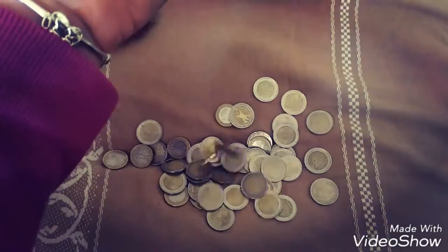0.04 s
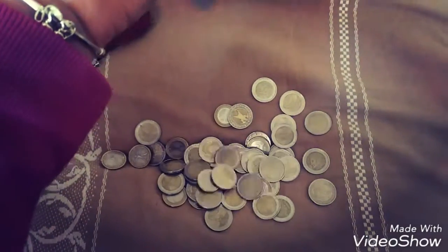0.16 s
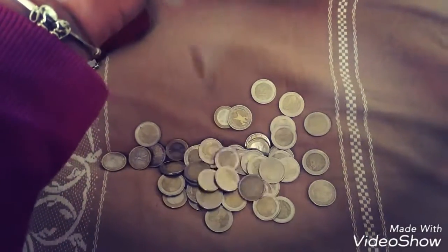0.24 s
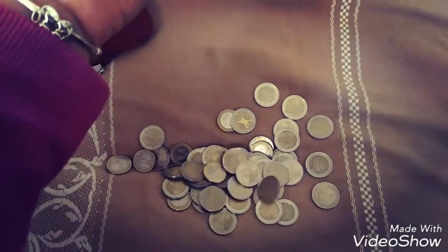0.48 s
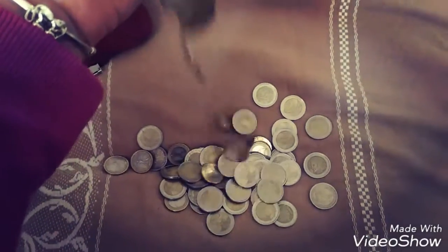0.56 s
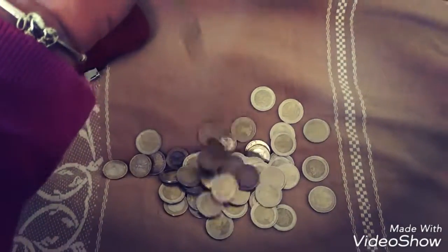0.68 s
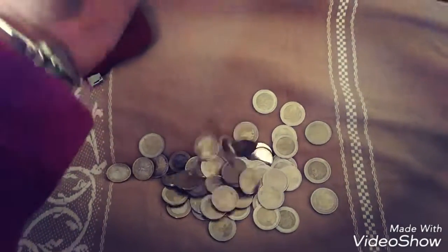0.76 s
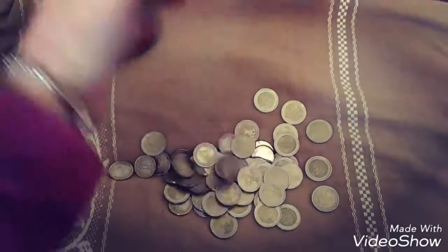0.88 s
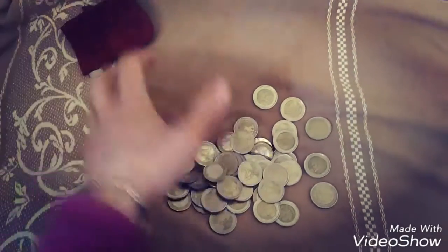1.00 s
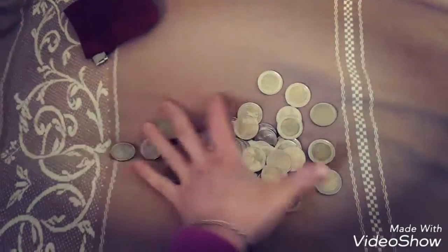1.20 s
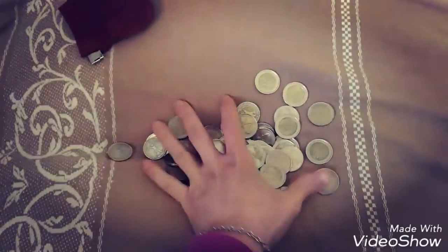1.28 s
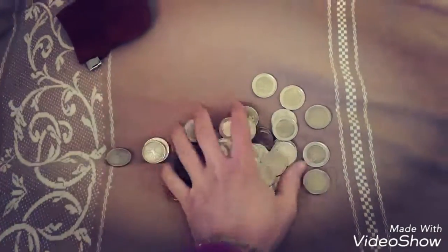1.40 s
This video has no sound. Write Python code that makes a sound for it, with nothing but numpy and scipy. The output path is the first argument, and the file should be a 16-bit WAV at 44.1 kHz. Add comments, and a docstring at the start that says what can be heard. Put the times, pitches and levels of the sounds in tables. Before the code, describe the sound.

Coins clink close by in a small room. After a few light ticks, they drop onto a pile in spurts at about 0.1, 0.3 and 0.6 seconds, each a short clack with a thin, high ring. The cloth-covered wooden table thuds under heavier hits. A dense jingle comes from 0.8 to 1.1 seconds as a hand lands and spreads them, then slides and faint clinks fade by 1.5 seconds.

```python
"""A faint slide and a few light clinks, then coins drop in spurts onto a pile on a cloth-covered
wooden table; a hand lands on the pile and spreads it. Each contact is a short clack, choked by the
other coins, with a thin ring near 10 kHz. Loose coins slide, jingle and drag on the cloth.
The table thuds under the heavier blows. A small room answers; the stereo microphone is close."""
import sys
import numpy as np
from scipy import signal
from scipy.fft import rfft, irfft, next_fast_len
from scipy.io import wavfile

SR = 44100
rng = np.random.default_rng(int(sys.argv[2]) if len(sys.argv) > 2 else 0)


def unload_wav(signal):
    """Save mono or channel-first audio to the path in sys.argv[1] as 16-bit WAV at rate SR, clipped to [-1, 1]."""
    wavfile.write(
        sys.argv[1],
        SR,
        np.round(np.clip(np.atleast_2d(signal).T, -1, 1) * 32767).astype(np.int16),
    )


N = 63945

# Room tone spectrum. Each row: frequency in Hz, gain in dB.
ROOM_TONE_EQ = [(25, -10), (60, -10), (130, -8.5), (400, -9), (900, -22), (2000, -12), (7000, -14),
                (14000, -31)]
# Loose coins sliding over each other. Each row: start in seconds, length in seconds,
# relative level in dB, left minus right in dB, cloth rub level in dB.
COIN_SLIDES = [(0.0, 0.023, -43, 4, -99), (0.083, .038, -51.5, -3, -75), (0.124, 0.023, -27.5, 1, -54),
               (0.158, .036, -32, -2.5, -58.5), (0.219, 0.081, -44, -2, -69), (0.291, 0.023, -38, -7, -63),
               (0.347, 0.086, -41.5, -1, -69.5), (0.583, .06, -39, -3, -71), (0.646, 0.034, -30, -2.5, -59),
               (.685, 0.049, -43.5, -1.5, -68), (0.751, .07, -37.5, 3, -62), (0.874, .035, -35, 3, -55),
               (0.9068, 0.026, -25.5, -2.5, -50.5), (0.947, 0.03, -29.5, 0, -50.5),
               (0.983, .06, -36, -1.5, -62.5), (1.046, .125, -39, -2, -63.5), (1.193, 0.023, -46, 2, -73),
               (1.239, 0.036, -44, -3, -65.5), (1.305, 0.07, -62.5, 4.5, -75),
               (1.431, 0.024, -52, 14.5, -69)]
# Ring of a coin in the pile. Each row: frequency in Hz, relative level in dB, T60 in seconds.
COIN_MODES = [(4650, -33, 0.052), (6210, -31, 0.056), (9230, -28.5, 0.034), (10177, -21.5, 0.057),
              (10400, -18.5, 0.023), (13960, -25.5, 0.034)]
# Tone of the sliding contacts. Each row: frequency in Hz, gain in dB.
SLIDE_EQ = [(100, -18), (350, -12.5), (700, -43), (1200, -27), (2000, -4), (3500, 2), (5000, -0.5),
            (8000, -0.5), (10200, 2), (11800, 4), (13400, -4), (14250, -1), (14800, -26)]
# Spectrum of rubbing on cloth. Each row: frequency in Hz, gain in dB.
CLOTH_EQ = [(30, -22), (65, -3.5), (120, 4), (200, 3), (400, 2), (650, -19), (1500, -60), (4000, -50)]
# Coin striking coin. Each row: start in seconds, relative level in dB, clack pitch in Hz,
# left minus right in dB.
COIN_HITS = [(0.0132, -34.5, 8600, -9), (0.038, -47.5, 8300, 21), (0.0967, -34.5, 9900, -5),
             (0.1042, -34, 9700, 8), (0.1285, -16, 6300, 2.5), (0.1353, -10, 6400, -2),
             (0.1383, -24, 8400, -9), (0.1453, -22.5, 7400, -9), (0.1728, -16.5, 6570, 2.5),
             (0.18, -36, 5600, -12), (0.192, -25.5, 8640, -4), (0.2921, -13, 6840, 1),
             (0.2959, -19, 8300, 0), (0.3158, -26.5, 6240, -13), (0.36, -28.5, 6230, 1),
             (0.3729, -34.5, 8700, 16), (0.3893, -26.5, 9100, -1), (0.4123, -24, 9200, -5),
             (0.4731, -36.5, 9800, 2), (0.5664, -11, 7140, -1.5), (0.5677, -26.5, 7140, 8),
             (0.6246, -27.5, 6730, 0), (0.6495, -11.5, 9500, -3.5), (0.6574, -20, 8200, -10),
             (0.7162, -30.5, 5860, 4), (0.7604, -31, 6400, -17), (0.782, -21.5, 6200, -4),
             (0.7844, -21.5, 5280, 4), (0.8013, -22, 6300, -11), (0.868, -30, 8700, -3),
             (0.8792, -27.5, 7900, -11), (0.9067, -25, 7600, -23), (0.9146, -14.5, 7300, 10),
             (0.9232, -13.5, 6200, 2), (0.9275, -15, 6330, -14), (0.9521, -20, 7260, 12),
             (0.9563, -22.5, 8400, 3), (0.9587, -19, 9300, -14), (1.0127, -17, 6600, 2),
             (1.0164, -17.5, 5940, -5), (1.0192, -21, 8300, 11), (1.0397, -26, 9050, -7),
             (1.1496, -25, 6260, 2), (1.1916, -24.5, 7140, -1), (1.1972, -30.5, 7100, 0),
             (1.2427, -27.5, 6300, -1.5), (1.2654, -30, 6620, -1), (1.4413, -29, 5400, 0)]
# Tone of the strikes at the microphone. Each row: frequency in Hz, gain in dB.
CLINK_EQ = [(100, -10.5), (350, -8), (700, -41.5), (1200, -22.5), (2300, -3), (4000, 4.5), (6000, -0.5),
            (8000, 2.5), (10200, 1), (11800, 4.5), (13300, -1.5), (14300, -10), (15000, -26.5)]
# Blows that reach the table. Each row: start in seconds, relative level in dB, thump pitch in Hz,
# knock relative to thump in dB.
TABLE_BLOWS = [(0.127, -33, 386, 3), (0.1348, -39.5, 338, 18), (.147, -35.5, 164, -23),
               (.156, -43, 105, -20), (0.18, -38.5, 346, -34), (.292, -41.5, 287, 12),
               (0.303, -46, 65, -13), (0.387, -51.5, 223, -18), (.566, -42, 284, 17.5),
               (0.623, -48.5, 290, 2.5), (0.654, -36.5, 270, 0), (0.781, -29, 210, 4.5),
               (0.905, -44.5, 272, -30), (0.916, -34, 175, -27), (0.928, -43, 340, -15),
               (0.948, -41, 75, -31), (0.959, -37, 288, -20), (1.017, -28.5, 227, -36),
               (1.025, -30.5, 143, -35), (1.192, -55.5, 335, 12.5), (1.242, -49, 414, 14)]
# Low modes of the table top. Each row: frequency in Hz, relative level in dB, T60 in seconds.
TABLE_MODES = [(66.4, -28, 0.21), (135, -26, 0.055), (420, -17.5, 0.0713)]
# Wood under a hard knock. Each row: frequency in Hz, relative level in dB, T60 in seconds.
WOOD_MODES = [(718, -30, 0.024), (1068, -27.5, 0.031), (1460, -26, 0.024), (1722, -26, 0.037),
              (2575, -22.5, 0.078)]
# Colour difference of the microphone ports. Each row: frequency in Hz, left minus right in dB.
PORT_BALANCE = [(100, 6), (500, 4.5), (1200, 2), (3000, -1), (5500, 11.5), (9000, 0), (14000, 3.5)]


def amp(db):
    return 10 ** (np.asarray(db) / 20)


def pan(left_minus_right_db):
    return amp(left_minus_right_db * np.array([[0.5], [-0.5]]))


def fade(t, t60_s):
    return np.exp(-np.log(1000) * t / t60_s)


def seconds(length_s):
    return np.arange(int(length_s * SR)) / SR


def curve_db(points, hz):
    """Interpolate (Hz, dB) points on a log frequency axis."""
    point_hz, point_db = np.transpose(points)
    return np.interp(np.log(hz + 1), np.log(point_hz + 1), point_db)


def filtered(x, gain_at_hz):
    """Zero-phase filter."""
    size = next_fast_len(N + SR // 2)
    gain = gain_at_hz(np.fft.rfftfreq(size, 1 / SR))
    return irfft(rfft(x, size) * gain, size)[..., :x.shape[-1]]


def coloured(x, eq, size=4096):
    """Minimum-phase filter from (Hz, dB) points."""
    gain = amp(curve_db(eq, np.fft.rfftfreq(size, 1 / SR)))
    cepstrum = irfft(np.log(gain))
    cepstrum[1:size // 2] *= 2
    cepstrum[size // 2 + 1:] = 0
    impulse = irfft(np.exp(rfft(cepstrum)))
    return signal.fftconvolve(x, impulse[None], axes=1)[:, :N]


def add(out, start_s, x):
    part = out[:, round(start_s * SR):]
    part[:, :x.shape[1]] += x[:, :part.shape[1]]


def in_room(x, early_db, tail_db, wall_delay_s=0.0016, right_lag_s=0.00012):
    """Direct sound, left port first, plus reflections and a tail drawn anew for each spot on the table."""
    t = seconds(0.3)
    early, tail = rng.standard_normal((2, 2, len(t))) * (1 - np.exp(-(t / wall_delay_s) ** 2))
    early *= fade(t, t60_s=0.043)
    tail *= fade(t, t60_s=0.18)
    paths = amp(early_db) * early / np.linalg.norm(early[0])
    paths += amp(tail_db) * tail / np.linalg.norm(tail[0])
    taps = np.arange(24) - 8 - np.array([[0], [right_lag_s * SR]])
    paths[:, :24] += np.sinc(taps) * np.exp(-(taps / 5) ** 2)  # direct path, fractional delay
    return signal.fftconvolve(x[None], paths, axes=1)


def room_tone(level_db=-66, shared=0.47):
    """Faint steady noise, partly common to both ports."""
    noise = rng.standard_normal((3, N))
    air = filtered(noise[:2] + shared * noise[2], lambda hz: amp(curve_db(ROOM_TONE_EQ, hz)))
    return amp(level_db) * air / air.std()


def coin_contact(clack_hz, ring_db, scatter_db=3, size_spread=0.0121, rise_s=0.00012):
    """One unit-energy contact: choked clack, broadband crack, ring of a coin of random size."""
    t = seconds(0.06)
    clack = np.sin(2 * np.pi * clack_hz * t) * fade(t, t60_s=0.0022)
    crack = amp(-5) * rng.standard_normal(len(t)) * fade(t, t60_s=0.003)
    ring = np.zeros(len(t))
    for hz, db, t60_s in COIN_MODES:
        strength, detune, phase = rng.standard_normal(3)
        mode = np.sin(2 * np.pi * hz * (1 + size_spread * detune) * t + np.pi * phase)
        ring += amp(db + scatter_db * strength) * mode * fade(t, t60_s)
    contact = (clack + crack + amp(ring_db) * ring) * (1 - np.exp(-t / rise_s))
    return contact / np.linalg.norm(contact)


def slides(coins=7, touches=6, median_hz=6200, pitch_spread=0.35, scatter_db=4, gain_db=1):
    """In each slide a handful of coins touch their neighbours a few times each."""
    out = np.zeros((2, N))
    for start_s, length_s, db, pan_db, _ in COIN_SLIDES:
        gain = amp(db + gain_db) * pan(pan_db) * np.sqrt(length_s * SR / coins) / 2
        for _ in range(coins):
            touch_s = (np.arange(touches) + rng.random(touches)) / touches * length_s
            force = amp(scatter_db * rng.standard_normal(touches))
            impulses = np.bincount((touch_s * SR).astype(int), force / np.linalg.norm(force))
            clack_hz = median_hz * np.exp(pitch_spread * rng.standard_normal())
            jingle = signal.fftconvolve(impulses, coin_contact(clack_hz, ring_db=-0.5))
            add(out, start_s, gain * in_room(jingle, early_db=-2.5, tail_db=-2.5))
    return out


def cloth_rub(width=0.5):
    """Sliding coins drag on the cloth: a faint rumble of the table top during each slide."""
    envelope = np.zeros((2, N))
    for start_s, length_s, _, _, rub_db in COIN_SLIDES:
        swell = np.sqrt(np.sin(np.pi * seconds(length_s) / length_s))
        add(envelope, start_s, amp(rub_db) * swell[None])
    noise = rng.standard_normal((3, N))
    rumble = filtered(noise[2] + width * noise[:2], lambda hz: amp(curve_db(CLOTH_EQ, hz)))
    return envelope * rumble / rumble.std()


def clinks(gain_db=10.5):
    """Single coins hit the pile: a dry snap, then a little ring."""
    out = np.zeros((2, N))
    for start_s, db, clack_hz, pan_db in COIN_HITS:
        hit = in_room(coin_contact(clack_hz, ring_db=-2.5), early_db=-8, tail_db=-5.5)
        add(out, start_s, amp(db + gain_db) * pan(pan_db) * hit)
    return out


def table_thuds(rise_s=0.0021, knock_cutoff_hz=1580):
    """The table takes blows through the cloth: damped thump, its own low modes, dull wooden knock."""
    out = np.zeros((2, N))
    t = seconds(0.2)
    lowpass = signal.butter(2, knock_cutoff_hz, fs=SR)
    top = sum(amp(db) * np.sin(2 * np.pi * hz * t) * fade(t, t60_s) for hz, db, t60_s in TABLE_MODES)
    wood = sum(amp(db) * np.sin(2 * np.pi * hz * t) * fade(t, t60_s) for hz, db, t60_s in WOOD_MODES)
    for start_s, db, thump_hz, knock_db in TABLE_BLOWS:
        thump = np.sin(2 * np.pi * thump_hz * t) * fade(t, t60_s=0.025)
        cushioned = (thump + top) * (1 - np.exp(-(t / rise_s) ** 2))
        burst = rng.standard_normal(len(t)) * fade(t, t60_s=0.0057)
        knock = amp(knock_db) * (wood + signal.lfilter(*lowpass, burst))
        add(out, start_s, amp(db) * in_room(cushioned + knock, early_db=-5, tail_db=-10.5))
    return out


def scene():
    """Coins, table, cloth and room together."""
    coins = coloured(clinks(), CLINK_EQ) + coloured(slides(), SLIDE_EQ)
    return coins + table_thuds() + cloth_rub() + room_tone()


def record(dry):
    """Stereo microphone: low cut, ports of unequal colour, steep band limit."""
    low_cut_hz, top_hz = 32.4, 15400
    cut = signal.lfilter(*signal.butter(3, low_cut_hz, 'high', fs=SR), dry)
    return filtered(cut, lambda hz: pan(curve_db(PORT_BALANCE, hz)) / (1 + (hz / top_hz) ** 80))


dry = scene()
out = record(dry)
unload_wav(out)
```